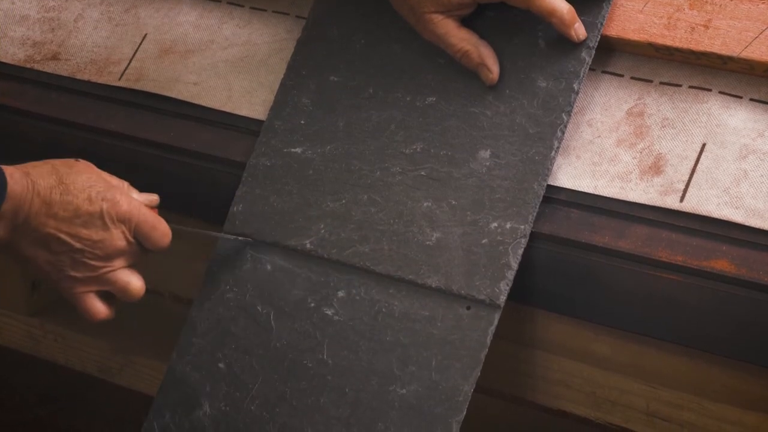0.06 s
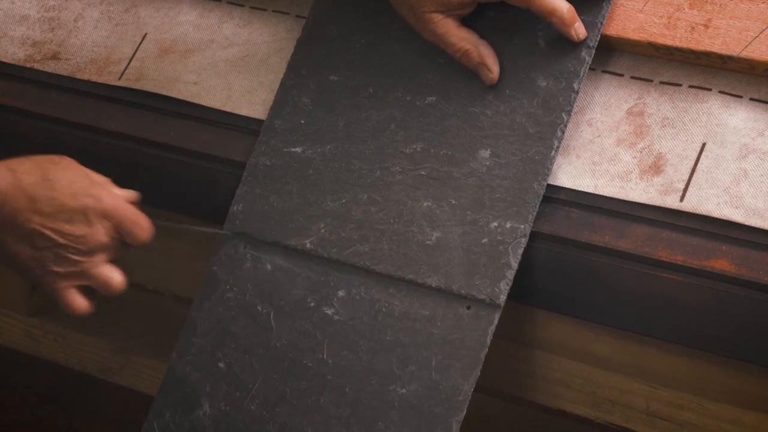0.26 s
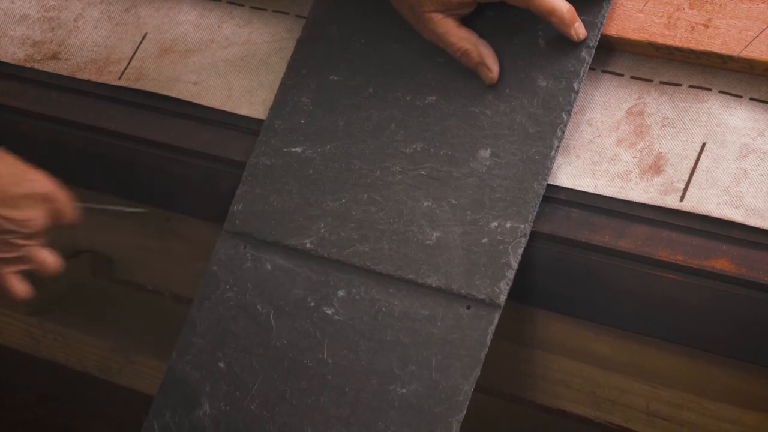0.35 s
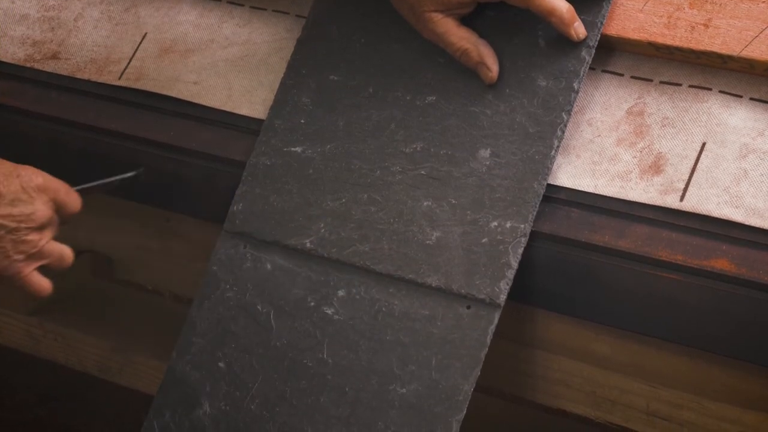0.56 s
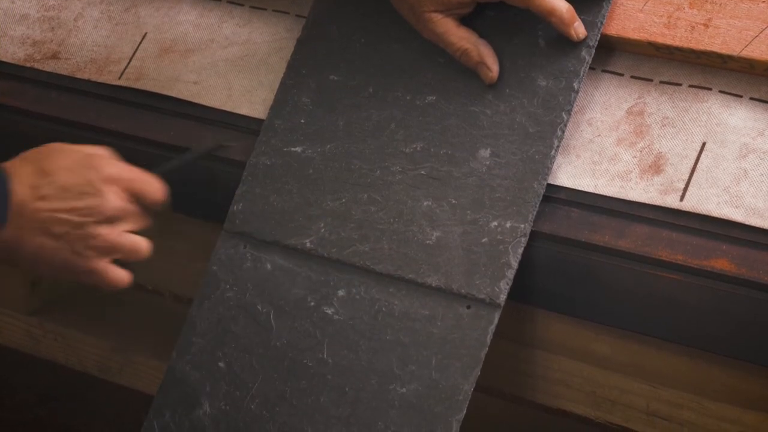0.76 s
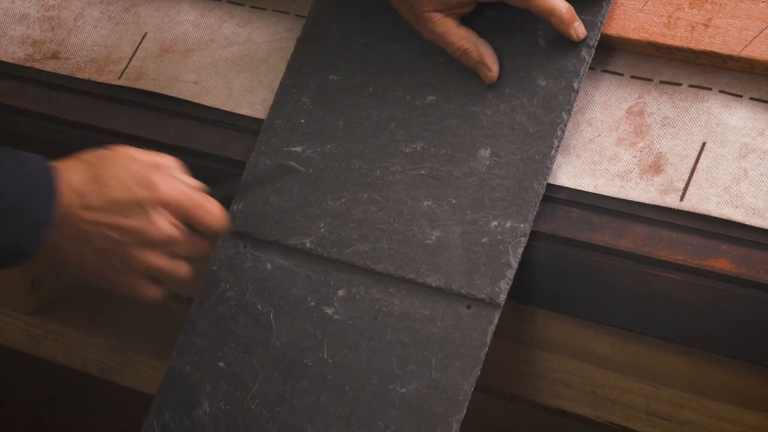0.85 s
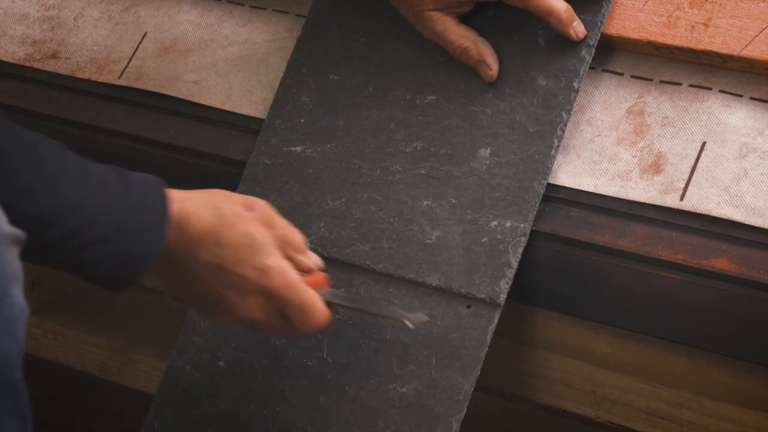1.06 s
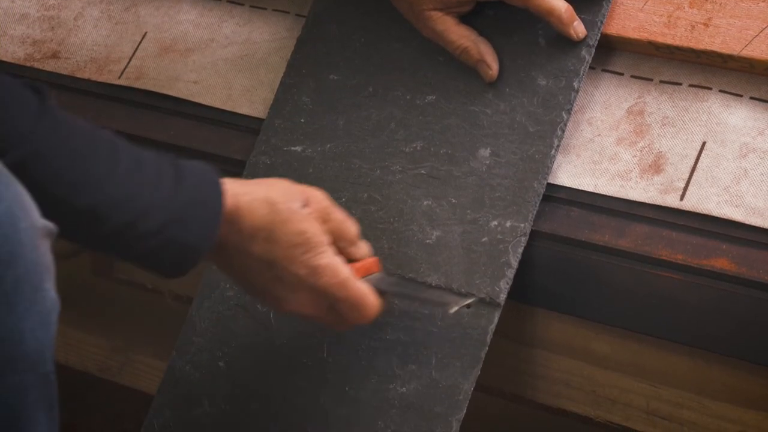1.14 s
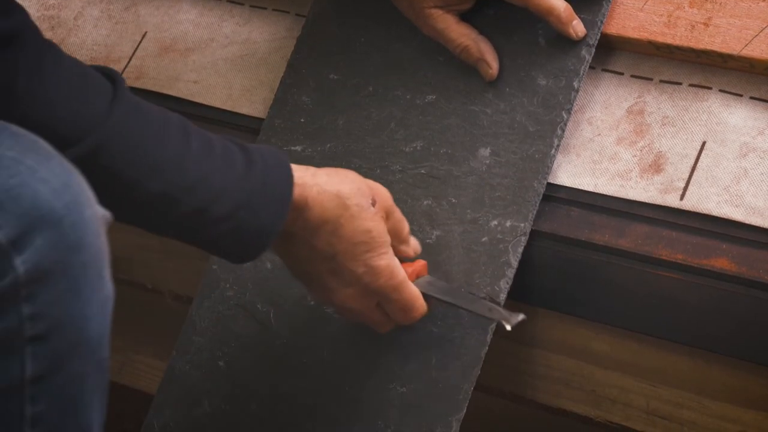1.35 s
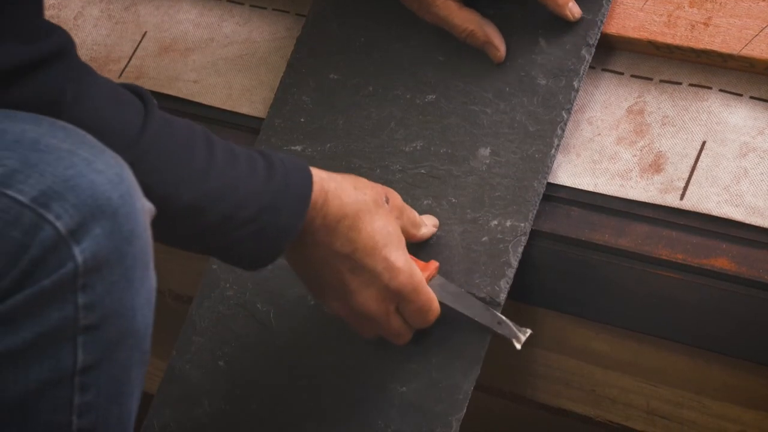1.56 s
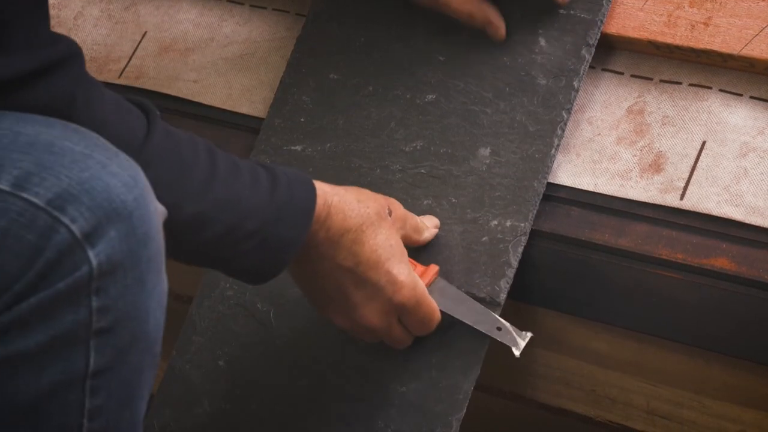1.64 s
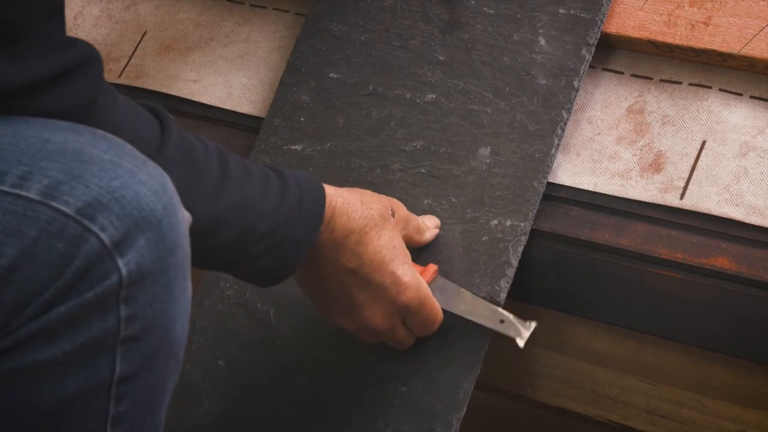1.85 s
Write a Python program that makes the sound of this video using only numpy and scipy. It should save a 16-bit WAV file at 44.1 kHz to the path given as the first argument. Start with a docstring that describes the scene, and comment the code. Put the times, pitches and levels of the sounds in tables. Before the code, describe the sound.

A steel tool scrapes briefly across roof slate, then knocks dully against it.

```python
"""A steel slater's tool is drawn from between roof slates in a reverberant workshop. As the previous
stroke dies away, a short stick-slip scrape swells, driving slate, blade and grit; at 0.28 s the blade
slips off the edge and rings on. In the pause crumbs tick, the roof frame thuds softly and a faint
whistle wavers. From 1.3 s the tool brushes the slate, then is set against it with two dull knocks
near 1.5 s; a sleeve rustles. Room air runs throughout."""
import sys
import numpy as np
from scipy import signal
from scipy.fft import rfft, irfft, next_fast_len
from scipy.io import wavfile
from scipy.ndimage import uniform_filter1d, map_coordinates

SR = 44100
rng = np.random.default_rng(int(sys.argv[2]) if len(sys.argv) > 2 else 0)


def pcm_store(signal):
    """Save signal as 16-bit PCM."""
    levels = np.round(np.clip(np.atleast_2d(signal), -1, 1) * 32767)
    wavfile.write(sys.argv[1], SR, levels.astype(np.int16).T)


N = 83790
LEAD_SAMPLES = SR // 4  # holds the previous stroke
T = np.arange(-LEAD_SAMPLES, N) / SR


# stroke envelope: t/s, slate level/dB, grit and blade level/dB
STROKE_LEVELS = [(0.177, -66.5, -72.5), (0.188, -49.5, -59.5), (0.203, -45.5, -50), (0.226, -50.5, -44.5),
                 (0.24, -41.5, -38), (.249, -33, -39.5), (0.27, -38, -30), (0.282, -39, -32),
                 (0.288, -31.5, -61), (.297, -64, -66)]
# blade catching on the edge: t/s, level/dB
EDGE_CATCHES = [(.204, -56), (.267, -31.5), (.2812, -33.5), (.2885, -39)]
# scraped slate modes: f/Hz, width/Hz, level/dB
SLATE_MODES = [(230.3, 29, -10.5), (462.6, 15, -2.5), (540, 9.2, -4), (623, 28, -0.5), (671.2, 19, -0.5),
               (696.7, 36.5, 1.5), (840, 48, -6.5), (964.3, 12, 0.5), (1166, 18.3, -7), (1216, 24, -7)]
# rubbing blade modes: f/Hz, width/Hz, level/dB
BLADE_MODES = [(1506, 44, 2.5), (1713, 29, 11), (1827, 34, -1), (1917, 25, 4), (2286, 14, 6.5),
               (2498, 35, 7.5), (2738, 14.2, 9.5), (3515, 21, 6), (3720, 14, -16), (4456, 54, 4),
               (5310, 36, 0.5), (5870, 58, 1.5), (6370, 37, 2.5), (6974, 22, 1.5)]
# grit spectrum: f/Hz, level/dB
GRIT_SPECTRUM = [(30, -24.5), (110, -11.5), (300, -7.5), (500, 11.5), (1150, 2), (1400, -18.5),
                 (1650, -1.5), (3300, 1), (4000, -4.5), (6800, -2.5), (7400, -6.5), (8400, -4.5),
                 (10200, -18), (11000, -11), (11800, -20), (12700, -7.5), (13500, -20), (16000, -25.5)]

def stroke(earlier_s):
    """Slips and edge catches drive slate, grit and blade; the room answers."""
    times, slate_db, grit_db = np.transpose(STROKE_LEVELS)
    chatter_db = 1.5 * wobble(knots_per_s=400)  # blade skips over the grain
    level = lambda db: amp(np.interp(T + earlier_s, times, db, left=-120, right=-120) + chatter_db)
    catches = sum(amp(db) * fade(s - earlier_s, t60_s=0.017) for s, db in EDGE_CATCHES) * slips()
    slate = filtered(level(slate_db) * slips() + catches, resonances(SLATE_MODES))
    force = level(grit_db) * slips() + catches
    grit = amp(-4.5) * filtered(force, lambda hz: unit(amp(along(GRIT_SPECTRUM, hz))))
    blade = amp(-2.5) * filtered(force, resonances(BLADE_MODES))
    reverb = room(amp(-3.5) * grit + amp(-18) * blade + amp(-11.5) * slate)
    return slate + grit + blade + reverb


# modes of freed tool and slates: f/Hz, level/dB, t60/s
RELEASE_MODES = [(856, -1.5, 0.68), (972, 1, 0.73), (1200, -8.5, .85), (2560, -8.5, 0.72),
                 (3540, -18, 0.91), (3490, -20.5, 0.96), (4420, -8, 0.35), (4900, -7, .5),
                 (5570, -32, 0.35), (8120, -28, 0.19)]

def release_ring(earlier_s):
    """Tool and slates ring on once the blade slips off the edge."""
    return ringing(0.282 - earlier_s, RELEASE_MODES, scatter_db=1.5, jitter=0.1)


# duller colour of the previous stroke: f/Hz, level/dB
PREVIOUS_COLOUR = [(100, -10), (210, 2), (400, -6), (680, -14), (1000, -5.5), (1800, -9), (2800, -5.5),
                   (4000, -13), (7000, -10), (13000, -14)]

def scrapes(gap_s=0.3):
    """Previous and main stroke, each with its ring."""
    previous = coloured(stroke(gap_s), PREVIOUS_COLOUR) + amp(-58.5) * release_ring(gap_s)
    return previous + stroke(0) + amp(-49.5) * release_ring(0)


# tool set on the slate: t/s, level/dB, low-pass f/Hz
KNOCK_CONTACTS = [(1.5127, -33.5, 2750), (1.5178, -35.5, 870), (1.5345, -40, 3540), (1.5405, -40, 2570),
                  (1.5745, -40.5, 3170), (1.5795, -34.5, 1680), (1.677, -52, 2450)]
# modes of the slate on its battens: f/Hz, level/dB, t60/s
DAMPED_SLATE_MODES = [(421, -9, 0.051), (577, -5, 0.054), (631.5, -5.5, 0.08), (693, -0.5, 0.031),
                      (891.5, -8, 0.063), (1106, -12, 0.065), (1454, -16, 0.054), (2084, -15, 0.041),
                      (3010, -16.5, 0.019), (3300, -41, 0.024), (5850, -25.5, 0.055)]

def knocks(attack_s=0.00089):
    """Each contact rings the damped slate with a brief crack; loose contact blurs the upper modes."""
    out = np.zeros(len(T))
    for s, db, cutoff_hz in KNOCK_CONTACTS:
        attack = 1 - np.exp(-np.maximum(T - s, 0) / attack_s)
        ring = attack * ringing(s, DAMPED_SLATE_MODES, scatter_db=4.5, jitter=0.46)
        crack = amp(-23.5) * fade(s, t60_s=0.022) * rng.standard_normal(len(T))
        out += amp(db) * filtered(ring + crack, lambda hz: 1 / (1 + 1j * hz / cutoff_hz))
    return out


# light touches: t/s, level/dB, rise/s, t60/s
BRUSH_SWELLS = [(1.341, -63.5, .003, 0.074), (1.351, -58.5, 0.0069, .1), (1.422, -62, 0.018, 0.067),
                (1.449, -68.5, .006, 0.15), (1.472, -59, 0.02, 0.38), (1.655, -63.5, 0.08, 0.18),
                (1.812, -67, .01, .12)]
# brushing spectrum: f/Hz, level/dB
BRUSH_SPECTRUM = [(60, -25.5), (200, 2.5), (400, 5), (700, -2.5), (1400, -7.5), (2200, -23.5), (2900, -14),
                  (4200, -28), (6500, -26.5), (13000, -44.5)]

def brushes():
    """Tool and hand rub lightly on the slate."""
    return swells(BRUSH_SWELLS) * unit(coloured(slips(), BRUSH_SPECTRUM))


# rustles: t/s, level/dB, rise/s, t60/s
SLEEVE_SWELLS = [(.87, -84, 0.017, 1), (1.47, -82, 0.11, 0.45), (1.675, -68.5, 0.092, 0.29),
                 (1.79, -77.5, 0.033, 0.59)]
# cloth spectrum: f/Hz, level/dB
CLOTH_SPECTRUM = [(500, 6.5), (2000, 1.5), (6500, -0.5), (10000, -4), (15000, -9)]

def sleeve():
    """Cloth friction in soft swells."""
    return swells(SLEEVE_SWELLS) * unit(coloured(slips(), CLOTH_SPECTRUM))


# ticks: t/s, level/dB
CRUMB_TICKS = [(0.633, -76), (0.7272, -74.5), (1.5338, -64.5), (1.541, -69), (1.851, -68), (1.8638, -69)]
# tick spectrum: f/Hz, level/dB
TICK_SPECTRUM = [(1000, -22.5), (3000, -2), (7000, 4.5), (10000, 0), (15000, -16)]

def crumbs():
    """Slate crumbs tick in short, bright noise bursts."""
    return sum(amp(db) * fade(s, t60_s=0.013) for s, db in CRUMB_TICKS) * noise(TICK_SPECTRUM)


# thuds: t/s, level/dB, rise/s, t60/s
FRAME_THUDS = [(.28, -60, 0.011, 0.2), (.405, -52.5, 0.011, 0.05), (1.025, -71, .03, 0.24),
               (1.09, -69, 0.016, 0.1), (1.575, -55, .03, 0.39), (1.83, -66, 0.0093, .3)]

def roof_frame(mode_hz=65.5):
    """Shifting weight excites the timber frame's lowest mode, slightly unsteady."""
    phase = 2 * np.pi * mode_hz * T + 0.33 * wobble(knots_per_s=17)
    return swells(FRAME_THUDS) * np.sqrt(2) * np.sin(phase)


# reverb decay: f/Hz, t60/s
REVERB_DECAY = [(150, 0.85), (400, 0.7739), (1000, 0.7628), (2800, 0.656), (7000, 0.53), (14000, 0.34)]
# reverb colour: f/Hz, level/dB
REVERB_COLOUR = [(100, 10.5), (500, -3.5), (1100, 1.5), (1400, 2.5), (2000, 1.5), (3400, -3), (5500, -6.5),
                 (8000, -19), (15000, -7)]

def room(x, build_up_s=0.017):
    """Diffuse workshop reverb; treble dies first."""
    hz, t, spectra = signal.stft(rng.standard_normal(SR), SR, nperseg=256)
    decay = amp(-60 * t / along(REVERB_DECAY, hz)[:, None])
    tail = signal.istft(spectra * decay, SR, nperseg=256)[1]
    tail *= 1 - np.exp(-(np.arange(len(tail)) / SR / build_up_s) ** 2)
    wet = signal.fftconvolve(x, tail / np.linalg.norm(tail))[:len(x)]
    return coloured(wet, REVERB_COLOUR)


# whistle contour: t/s, f/Hz, level/dB
WHISTLE_CONTOUR = [(1.03, 10800, -110), (1.09, 12000, -91), (1.13, 12110, -92), (1.19, 11900, -108),
                   (1.24, 12400, -89), (1.273, 12950, -85), (1.33, 11700, -99), (1.4, 12600, -85),
                   (1.45, 12200, -112)]

def whistle():
    """A faint, thin tone with wavering pitch."""
    times, hz, db = np.transpose(WHISTLE_CONTOUR)
    glide_hz = uniform_filter1d(np.interp(T, times, hz), size=1500)
    pitch_hz = glide_hz + 350 * rng.standard_normal(len(T))
    level = amp(np.interp(T, times, db, left=-140, right=-140))
    return level * np.sin(2 * np.pi * np.cumsum(pitch_hz) / SR)


# room air spectrum: f/Hz, level/dB
AIR_SPECTRUM = [(15, -43.5), (25, -14), (66, -4), (90, -13.5), (146, -11), (202, -23.5), (354, -17),
                (383, -20.5), (475, -17), (1910, -37), (2430, -35.5), (12400, -49.5), (15000, -71.5)]

def air():
    """Steady, low room noise."""
    return amp(-68.5) * noise(AIR_SPECTRUM)


def slips(rate_per_s=14000, spread_db=0.5):
    """Dense, irregular stick-slip impulses, rms 1."""
    slipping = rng.random(len(T)) < rate_per_s / SR
    size = amp(spread_db * rng.standard_normal(len(T)))
    sign = rng.choice([-1, 1], len(T))
    return unit(slipping * size * sign)


def ringing(start_s, modes, scatter_db, jitter):
    """Struck, damped modes with random levels and relative pitch jitter."""
    out = np.zeros(len(T))
    for hz, db, t60_s in modes:
        level = amp(db + scatter_db * rng.standard_normal())
        pitch_hz = hz * (T >= start_s) * (1 + jitter * rng.standard_normal(len(T)))
        out += level * fade(start_s, t60_s) * np.sin(2 * np.pi * np.cumsum(pitch_hz) / SR)
    return out


def resonances(modes):
    """Causal response of modes of alternating sign, unit power gain."""
    return lambda f: unit(sum((-1) ** k * amp(db) * 1j * f * width / (hz * hz - f * f + 1j * f * width)
                              for k, (hz, width, db) in enumerate(modes)))


def fade(start_s, t60_s):
    """Abrupt onset, exponential decay."""
    return (T >= start_s) * amp(-60 * np.maximum(T - start_s, 0) / t60_s)


def swells(rows):
    """Gaussian rise to each peak, then exponential decay."""
    return sum(amp(db) * np.where(T < s, np.exp(-((T - s) / rise_s) ** 2), fade(s, t60_s))
               for s, db, rise_s, t60_s in rows)


def wobble(knots_per_s):
    """Smooth random curve."""
    return map_coordinates(rng.standard_normal(len(T)), [(T - T[0]) * knots_per_s])


def noise(spectrum):
    """Coloured noise, rms 1."""
    return unit(coloured(rng.standard_normal(len(T)), spectrum))


def coloured(x, spectrum):
    """Shape x by (f/Hz, level/dB) points."""
    return filtered(x, lambda hz: amp(along(spectrum, hz)))


def filtered(x, response):
    """Apply a complex frequency response."""
    size = next_fast_len(len(x) + SR // 2)
    return irfft(rfft(x, size) * response(np.fft.rfftfreq(size, 1 / SR)), size)[:len(x)]


def along(points, hz):
    """Interpolate (f/Hz, value) points over log frequency."""
    knots_hz, values = np.transpose(points)
    return np.interp(np.log(hz + 1), np.log(knots_hz + 1), values)


def unit(x):
    """Scale to rms 1."""
    return x / np.sqrt(np.mean(np.abs(x) ** 2) + 1e-20)


def amp(db):
    """Decibels to gain."""
    return 10 ** (np.asarray(db) / 20)


def scene():
    """Slate work and background, mono."""
    handling = knocks() + brushes() + sleeve() + crumbs()
    mix = scrapes() + handling + amp(-9) * room(handling) + roof_frame() + whistle() + air()
    return mix[None, LEAD_SAMPLES:]


def record(dry):
    """Brick-wall low-pass."""
    return np.array([filtered(x, lambda hz: hz < 15700) for x in dry])


dry = scene()
out = record(dry)
pcm_store(out)
```